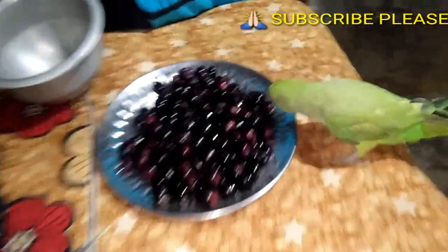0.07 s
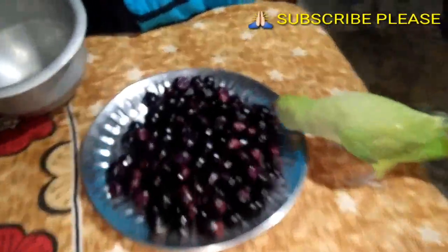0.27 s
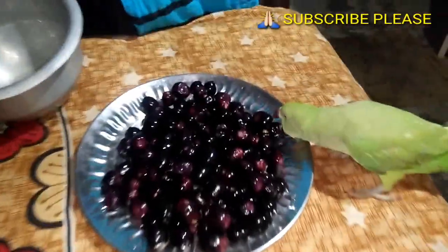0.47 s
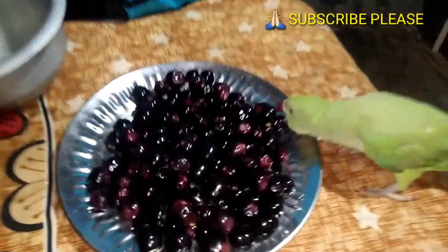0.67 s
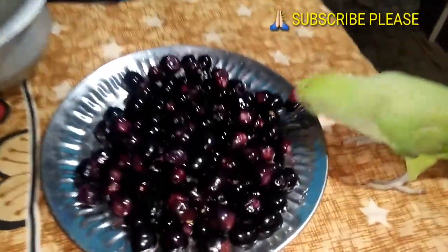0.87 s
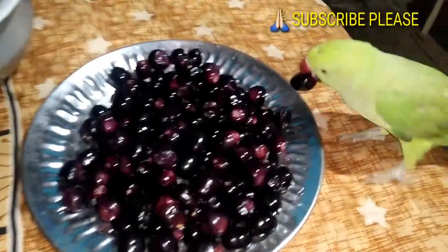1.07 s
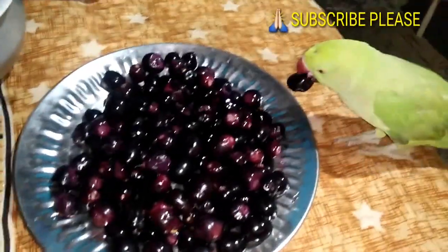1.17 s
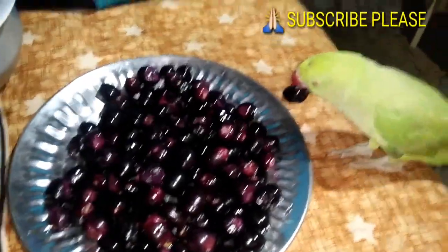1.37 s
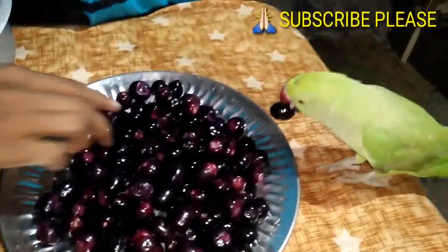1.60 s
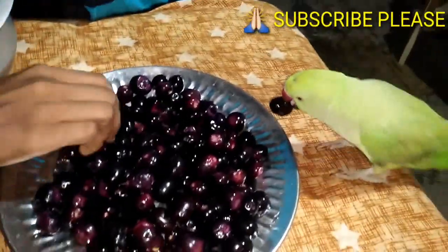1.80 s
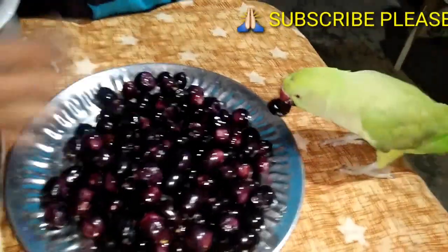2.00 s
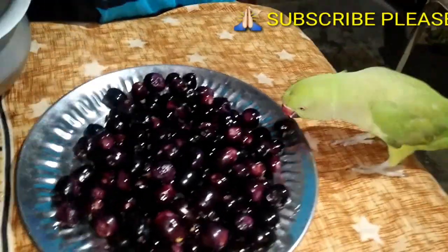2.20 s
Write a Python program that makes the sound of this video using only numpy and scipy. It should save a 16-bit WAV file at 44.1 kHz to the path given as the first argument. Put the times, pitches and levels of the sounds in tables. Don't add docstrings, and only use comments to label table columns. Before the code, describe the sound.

A parakeet calls twice, each soft whistle sweeping up into a piercing, fluttering shriek with room echo; then abruptly a quiet, close table view with hum, soft thuds, faint metal ticks and a hand rustling through berries.

```python
import sys
import numpy as np
from scipy import signal
from scipy.fft import rfft, irfft, next_fast_len
from scipy.io import wavfile
from scipy.ndimage import uniform_filter1d, minimum_filter1d, map_coordinates

SR = 44100
rng = np.random.default_rng(int(sys.argv[2]) if len(sys.argv) > 2 else 0)


def wav_out(sig):
    wavfile.write(sys.argv[1], SR, np.round(np.clip(np.atleast_2d(sig).T, -1, 1) * 32767).astype(np.int16))


def field_ratio(decibels):
    return 10 ** (np.asarray(decibels, dtype=float) / 20)


N = 99225
CUT_S = .7368
AHEAD, SHOT = SR * 3 // 10, SR * 4 // 5
LEFT_RIGHT = np.array([[1], [-1]])


def unit(x):
    return x / np.sqrt(np.mean(x ** 2) + 1e-20)


def along(points, hz):
    f, v = np.transpose(points)
    return np.interp(np.log(hz + 1), np.log(f + 1), v)


def wobble(rate, size=N, order=3):
    knots = rng.standard_normal(int(size * 2000 / SR) + 4)
    return map_coordinates(knots, [np.arange(size) * rate / SR], order=order)


def coloured(spectrum):
    m = next_fast_len(N + 8192)
    white = rfft(rng.standard_normal(m))
    return unit(irfft(white * field_ratio(along(spectrum, np.fft.rfftfreq(m, 1 / SR))), m)[:N])


def since(s):
    return np.maximum(np.arange(N) / SR - s, 0)


def hum():
    # (frequency [Hz], level per Hz [dB])
    hum_colour = [(25, -25), (90, -11), (400, -9), (1000, -9), (2400, -6.5), (3500, -15.5), (5000, -14),
                  (6300, -28), (15500, -40)]
    # (time [s], level [dB])
    hum_level = [(0, -60.5), (.25, -58), (.55, -60), (.65, -64.5), (.73, -61), (0.759, -60), (1.301, -59),
                 (1.501, -59), (1.738, -59), (1.82, -61.5), (1.95, -60.5), (2.068, -60.5), (2.12, -57)]
    rumble_colour = [(30, -18.5), (80, -2), (250, -1.5), (450, -16.5), (900, -94.5)]
    first_view = since(CUT_S) == 0
    s, db = np.transpose(hum_level)
    loudness = field_ratio(np.interp(np.arange(N) / SR, s, db) + 1.54 + 1.5 * first_view)
    rumble = coloured(rumble_colour) * field_ratio(2 * wobble(30) - 3 * first_view - 5.5)
    side = field_ratio(-8.5) * first_view * coloured(hum_colour) * LEFT_RIGHT
    steady = coloured(hum_colour) * field_ratio(1.2 * wobble(40))
    return loudness * (steady + rumble + side)


def thuds():
    # (time [s], peak level [dB], pitch [Hz])
    steps = [(0.24, -41, 40), (0.248, -42, 220), (0.359, -53, 80.7), (0.925, -48, 275), (1.078, -31.5, 200),
             (1.28, -43.5, 96.9), (1.295, -37, 231), (1.408, -43, 61.9), (1.492, -36.5, 62.7),
             (1.506, -41, 78.1), (1.551, -37.5, 238), (1.598, -45, 99.6), (1.958, -37.5, 138),
             (2.091, -24.5, 150), (2.124, -63, 88.8), (2.149, -40, 159), (2.242, -38, 238)]
    ring_cycles, late_s = 1.36, .002
    out = 0
    for s, db, hz in steps:
        cycles = since(s + late_s) * hz
        fade = field_ratio(db + 2 - 60 * cycles / (2 * ring_cycles))
        out = out - fade * np.sin(2 * np.pi * cycles) * (1 - np.exp(-cycles / 0.13))
    return out - uniform_filter1d(out, size=500)


def scrapes():
    # (time [s], peak level [dB], time to fall 60 dB [s], brightness [dB])
    strokes = [(0.8365, -64, 0.12, -1.5), (0.9252, -62.5, 0.14, -3), (0.9767, -48, 0.076, -2),
               (1.1674, -58, 0.12, -20), (1.27, -49, 0.16, -10.5), (1.3716, -48, 0.12, -8),
               (1.4446, -43.5, 0.074, -5), (1.4643, -37.5, 0.13, -6), (1.4794, -53.5, 0.14, 2.5),
               (1.501, -43.5, 0.2, -5.5), (1.5474, -37.5, 0.11, -6.5), (1.5543, -40.5, 0.18, -2),
               (1.5835, -36.5, 0.14, -2.5), (1.605, -34, 0.1, -6), (1.6396, -43, 0.11, -6),
               (1.6711, -51, 0.13, -9.5), (1.7687, -51, 0.093, -11), (1.9594, -52, 0.16, -20),
               (2.09, -36, 0.16, -8), (2.1075, -36.5, 0.19, -3.5), (2.1354, -40.5, 0.34, -4),
               (2.159, -47, 0.32, 0), (2.201, -46.5, 0.39, -5.5), (2.233, -39, 0.1, -2)]
    # (frequency [Hz], level per Hz [dB])
    berries = [(240, -22), (400, -6), (1230, -6.5), (1410, -4), (2840, -2), (4620, 1.5), (6000, -13),
               (7800, -32), (13200, -120)]
    # (frequency [Hz], level per Hz [dB])
    rustle = [(3530, -49), (6000, 5.5), (8650, -2), (11400, 1.5), (14500, -18.5)]
    rise_s, body_db, rustle_db, grain_db = 0.0016, -6.5, -9.5, 1.5
    body, bright = 0, 0
    for s, db, t60, bright_db in strokes:
        t = since(s)
        stroke = field_ratio(db - 60 * t / max(t60, .01)) * (1 - np.exp(-t / rise_s))
        body = body + stroke ** 2
        bright = bright + (stroke * field_ratio(bright_db)) ** 2
    grain = field_ratio(body_db + grain_db * wobble(220))
    body_noise = np.sqrt(body) * coloured(berries)
    rustle_noise = field_ratio(rustle_db) * np.sqrt(bright) * coloured(rustle)
    return grain * (body_noise + rustle_noise)


def ticks():
    # (time [s], peak level [dB], share of the full ring length [1])
    taps = [
        (.8295, -60, 1.6),
        (.9388, -64, 0.92),
        (0.9744, -68.5, .3),
        (1.0067, -51.5, .25),
        (1.0804, -40.5, 0.84),
    ]
    # (frequency [Hz], level [dB], time to fall 60 dB [s])
    plate = [(4930, -11, 0.16), (5350, -15.5, 0.16), (6340, -29, 0.22), (9660, -11, 0.08),
             (10480, -1.5, 0.07), (12000, -18, .11)]
    crack_colour = [(300, 1.5), (2500, -2.5), (7000, -13.5), (10000, -28), (13000, -25)]
    out, size = np.zeros(N), SR // 4
    t = np.arange(size) / SR
    for s, db, share in taps:
        ring = 0
        for hz, tone_db, t60 in plate:
            unsteady_db = 3.5 * wobble(150, size, order=1)
            fade_db = 60 * t / (t60 * max(share, .05))
            ring = ring + field_ratio(tone_db + unsteady_db - fade_db) * np.sin(2 * np.pi * hz * t)
        crack = field_ratio(6 - 60 * t / .012) * coloured(crack_colour)[:size]
        out[round(s * SR):][:size] += field_ratio(db) * (ring + crack) * (1 - np.exp(-t / 0.00085))
    return out


def nostril_hiss(hz, effort, closing):
    # (lowest frequency [Hz], climb [Hz], width [Hz], level [dB])
    whistles = [(10400, 1400, 630, 0), (10900, 1700, 500, -4), (13900, 800, 500, -15)]
    size, from_hz = len(hz), 975
    lift = np.tanh((hz - from_hz) / 397)
    air = 0
    for low_hz, climb_hz, width_hz, db in whistles:
        turn = 2 * np.pi * np.cumsum(low_hz + climb_hz * lift) / SR
        air = air + field_ratio(db) * wobble(width_hz, size) * np.sin(turn)
    opening = np.clip((hz - from_hz) / 120, 0, 1) * (1 - .85 * effort ** 4) * (1 - closing)
    return field_ratio(-50.5 + 7.5 * wobble(35, size)) * opening * air


def call(rows, full_db, shift_s, rough):
    whistle_db = [-30, 0, -8, -25, -32, -20, -36, -38, -42, -40, -36]
    closing_db = [-17, -11, 4, -9.5, -7, -7, -6.5, -13, -21, -25.5, -25.5]
    # (frequency [Hz], level [dB])
    beak = [(3300, 0.5), (4000, -6), (4900, 0), (6100, 2), (6900, 0.5), (7350, -14.5), (8000, 0)]
    # (frequency [Hz], level [dB])
    throat = [(6900, 0), (7350, -9), (8000, 1), (10200, 1), (10800, -24), (11600, -18), (12400, -40),
              (15000, -50)]
    # (frequency [Hz], level per Hz [dB])
    rasp_colour = [(300, -41), (1000, -12.5), (2600, -2.5), (4300, -1), (5500, -9.5), (7400, -7.5),
                   (9000, -1), (10300, -11.5), (11000, -40.5)]
    soft_hz, full_hz = 1050, 1400
    flutter_hz, flutter_depth, flutter_db, jitter = 250, 0.018, 1.63, .002
    size = SHOT + AHEAD
    t = (np.arange(size) - AHEAD) / SR + shift_s
    s, *cols = np.transpose(rows)
    hz, db, closing = [np.interp(t, s, c) for c in cols]
    closing = np.clip(closing, 0, 1)
    effort = np.clip((hz - soft_hz) / (full_hz - soft_hz) + closing, 0, 1)
    chest = np.clip((hz - 985) / 90.14 + closing, 0, 1)

    beat = 2 * np.pi * np.cumsum(flutter_hz * (1 + .06 * wobble(40, size))) / SR
    flutter = np.sqrt(rough) * flutter_depth * np.sin(beat)
    bend = effort * (flutter + jitter * wobble(700, size))
    phase = 2 * np.pi * np.cumsum(hz * (1 + bend)) / SR
    hoarse = np.clip(.02 * rough * effort + .85 * closing, 0, .95)
    out = 0
    for k, (soft, full, shut) in enumerate(zip(whistle_db, full_db, closing_db)):
        turn = (k + 1) * phase + rng.uniform(0, 2 * np.pi)
        width_hz = min(360 * (1 + 0.47 * k), 1900)
        a, b = [wobble(width_hz, size, order=1) for _ in range(2)]
        clear = np.sqrt(2 - 2 * hoarse) * np.sin(turn)
        smeared = np.sqrt(hoarse) * (a * np.sin(turn) + b * np.cos(turn))
        open_db = soft + (effort if k else chest) * (full - soft)
        drift_db = 1.5 * wobble(60, size, order=1)
        strength = field_ratio((1 - closing) * open_db + closing * shut + drift_db)
        out = out + strength * (clear + smeared) * field_ratio(along(beak, (k + 1) * hz))
    pulsing = effort ** .5 * (1 + 0.88 * np.cos(beat))
    out = out + field_ratio(-28 + 19 * closing) * pulsing * coloured(rasp_colour)[:size]

    gate = np.clip(np.minimum(t - s[0], s[-1] - t) / 0.011, 0, 1)
    throb_db = effort * min(rough, 3) * flutter_db * np.cos(beat)
    m = next_fast_len(size)
    voice = rfft(gate * out * field_ratio(db + throb_db), m)
    voice = irfft(voice * field_ratio(along(throat, np.fft.rfftfreq(m, 1 / SR))), m)[:size]
    facing = field_ratio(11 * closing)
    return voice + gate * nostril_hiss(hz, effort, closing), facing


def room(x, facing):
    # (frequency [Hz], time to fall 60 dB [s])
    walls = [(500, .45), (2000, 0.3), (3200, 0.45), (4300, 0.48), (7000, 0.48), (11000, 0.2)]
    wet_db, early_db, early_s, wide_db, pan_db = -11, -16.5, .02, -7, -0.75
    hz, t, z = signal.stft(rng.standard_normal((2, SR)), SR, nperseg=256)
    tail = signal.istft(z * field_ratio(-60 * t / along(walls, hz)[:, None]), SR, nperseg=256)[1]
    rise = np.clip(np.arange(tail.shape[1]) / SR / 0.005, 0, 1)
    tail = field_ratio(wet_db) * tail / np.linalg.norm(tail[0]) * rise
    when, sizes = rng.uniform(.05, 1, (2, 9)), rng.standard_normal((2, 9))
    for part in range(2):
        tail[part, (when[part] * early_s * SR).astype(int)] += field_ratio(early_db) * sizes[part]
    mid, side = signal.fftconvolve((x * facing)[None], tail, axes=1)[:, :len(x)]
    return (x + mid) * field_ratio(pan_db * LEFT_RIGHT) + field_ratio(wide_db) * side * LEFT_RIGHT


def parakeet():
    # (time [s], pitch [Hz], level [dB], beak closing [0-1])
    shrieks = [
        [(.05, 1005, -46.5, 0), (.085, 967, -37, 0), (.155, 998.5, -43, 0.22), (.188, 1139, -28.5, 0.29),
         (.228, 1492, -13.5, 0.04), (.256, 1596, -7.5, 0.05), (.286, 1567, -14, 0.1), (.292, 1433, -22.5, 0.89),
         (.335, 1316, -32, .95)],
        [(.44, 920, -41.5, 0), (.46, 961.8, -40.5, 0.03), (.535, 971, -40, 0), (.586, 1125, -40, 0.03),
         (.63, 1677, -13.5, 0.07), (.655, 1733, -14.5, 0.06), (.685, 1659, -16.5, 0.28), (.7, 1542, -23.5, .25),
         (.722, 1400, -40.5, 0.4)],
    ]
    shriek_db = [
        [-23.5, 0.0054, -21, -14, -21.5, -19, -24, -29.5, -34, -32.5, -30.5],
        [-13.5, 0.014, -13, -10, -2, -13.5, -21, -22, -31.5, -32.5, -26],
        [-32, 0.00026, -18, -21, -17.5, -14, -21, -29, -39.5, -32, -31],
    ]
    rough = [.8, 2.3, 12]
    earlier_s, earlier_db = 0.33, -8.5
    first, second = shrieks
    before = room(*call(first, shriek_db[2], earlier_s, rough[2]))
    heard = field_ratio(earlier_db) * before
    heard = heard + room(*call(first, shriek_db[0], 0, rough[0]))
    heard = heard + room(*call(second, shriek_db[1], 0, rough[1]))
    heard = np.pad(heard[:, AHEAD:], [(0, 0), (0, N - SHOT)])
    after = since(CUT_S)
    fade = np.where(after > 0, field_ratio(-30) * np.exp(-after / .005), 1)
    return heard * uniform_filter1d(fade, size=40)


def scene():
    return hum() + thuds() + scrapes() + ticks() + parakeet()


def roll_off(x):
    return signal.sosfilt(signal.butter(12, 15710, fs=SR, output="sos"), x)


def record(dry):
    ceiling, look = .97, 351
    need = ceiling / np.maximum(np.abs(dry).max(axis=0), ceiling)
    gain = uniform_filter1d(minimum_filter1d(need, size=look), size=look)
    return roll_off(dry * gain)


dry = scene()
out = record(dry)
wav_out(out)
```